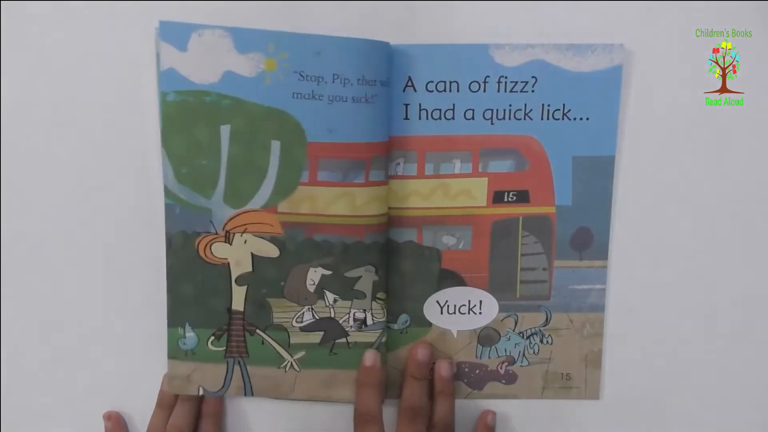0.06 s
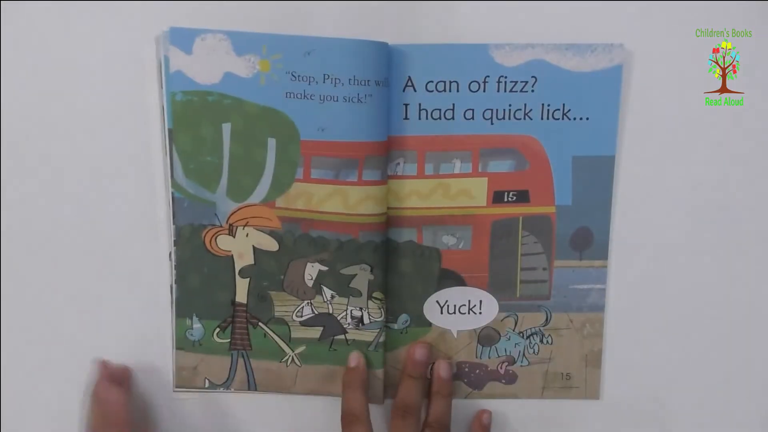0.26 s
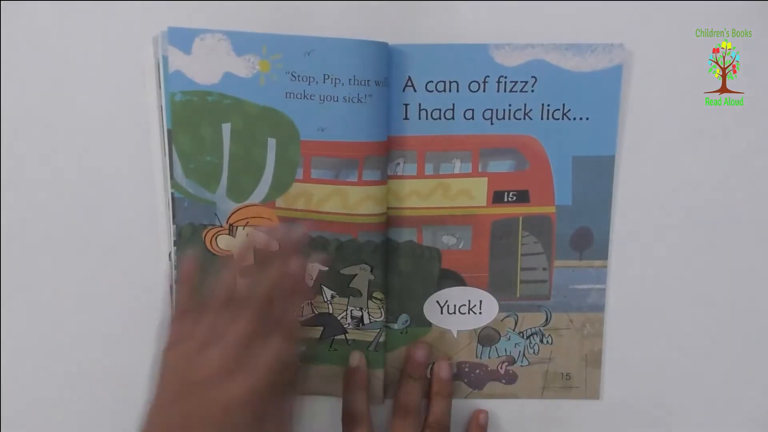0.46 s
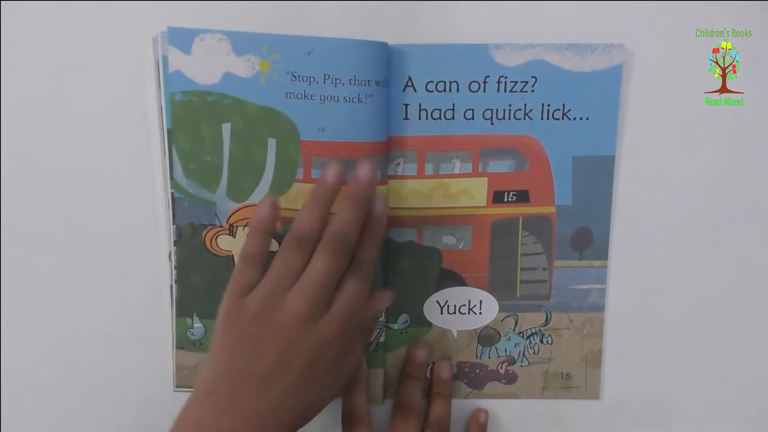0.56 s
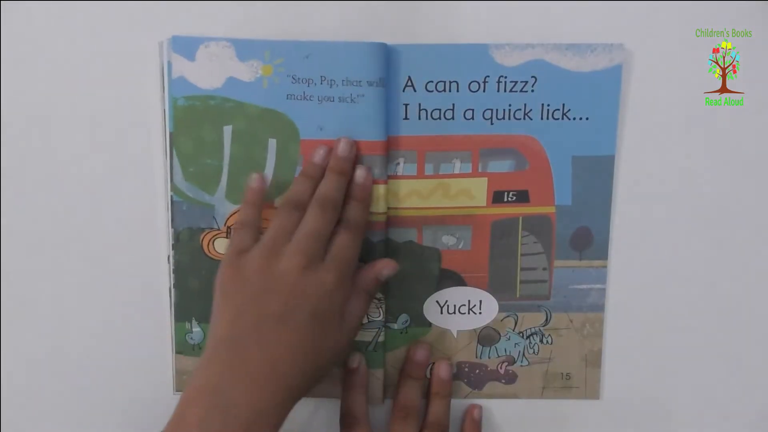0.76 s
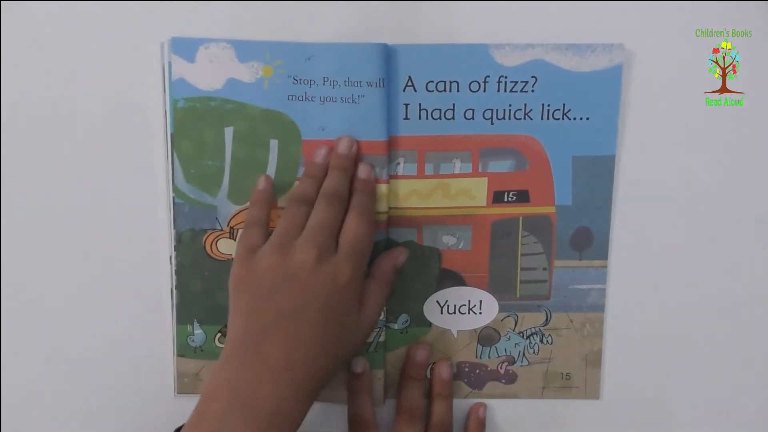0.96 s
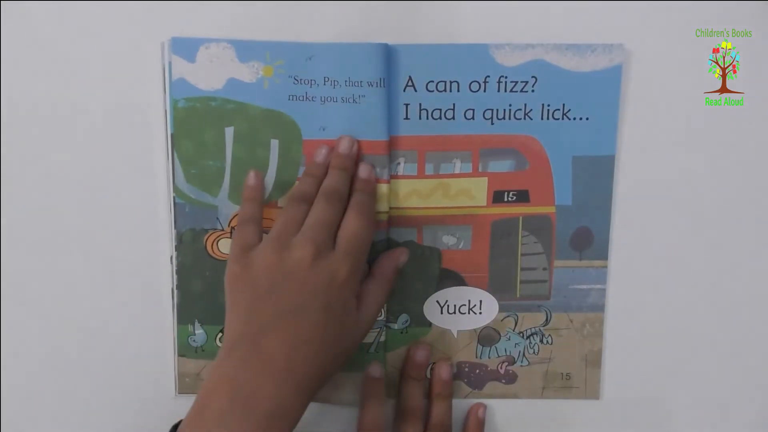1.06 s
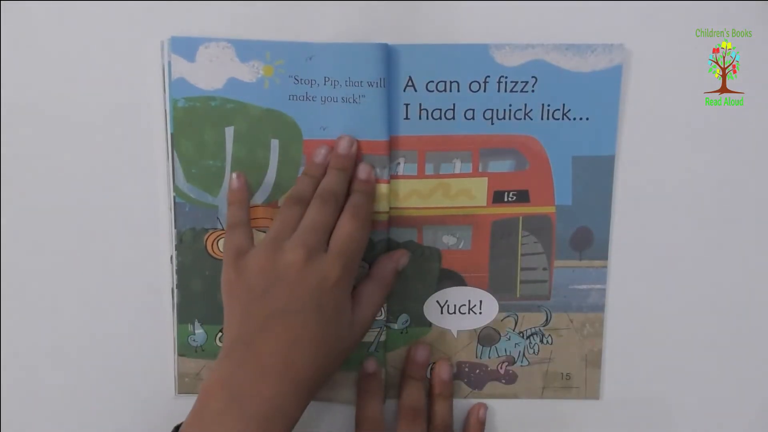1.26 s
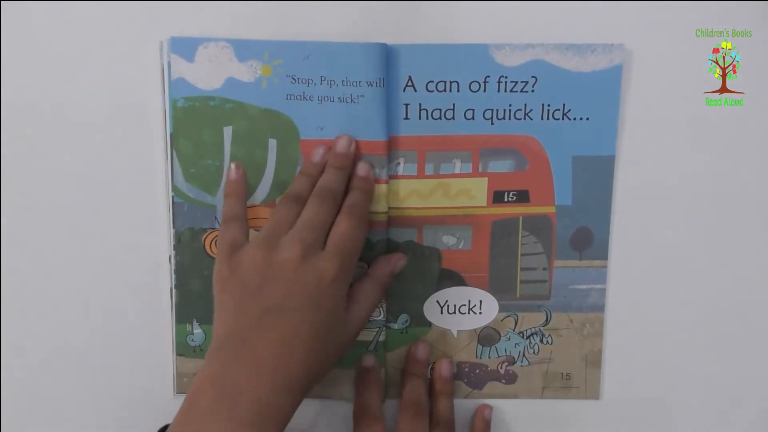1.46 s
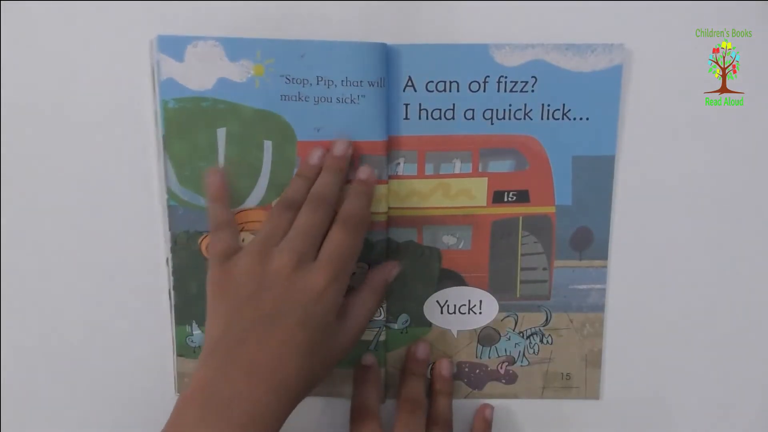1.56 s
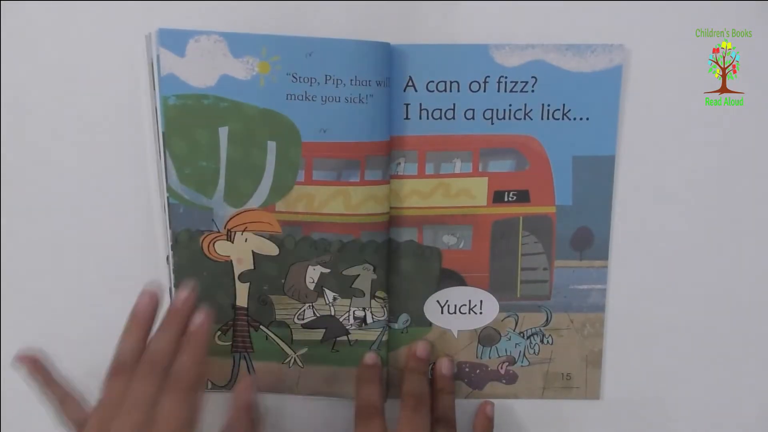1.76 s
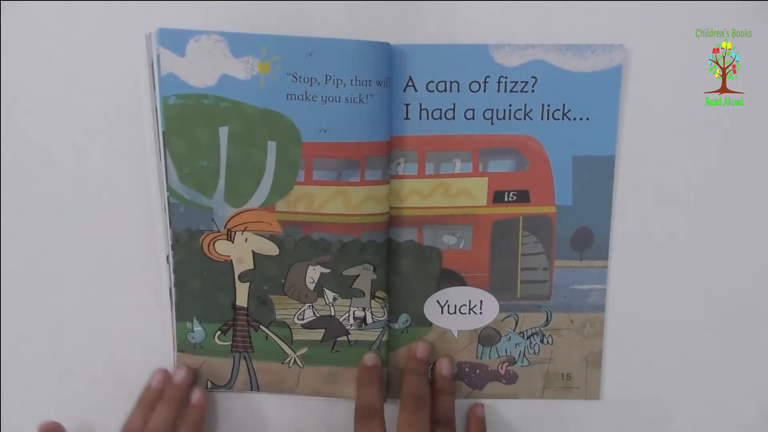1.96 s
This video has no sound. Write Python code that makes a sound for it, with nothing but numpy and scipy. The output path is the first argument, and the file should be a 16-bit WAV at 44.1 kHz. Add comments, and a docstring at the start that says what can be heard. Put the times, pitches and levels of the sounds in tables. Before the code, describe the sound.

A thin book's glossy page slides down with light ticks and growing rustle, then slaps flat with a sharp, loud snap at about 0.27 seconds, ending in a short hiss of air. Much quieter paper crackles come at 0.7 and 0.95, soft dull table thuds near 1.25-1.35, and a muted press-and-lift knock at 1.7. Close microphone, small quiet room, low hum, hiss, faint high whine and an intermittent thin buzz.

```python
"""Page slapping flat, close up

A small quiet room, the microphone close to a thin book: a hand lets a glossy page slide and slap flat, then
presses and lifts off it. Clicks ring the page as snaps, dense noise slips ring it as rustle, and a narrow hiss
follows the slide. Decaying sines thud in the table. Shaped noise gives room tone and microphone hiss, rung noise
a wavering hum, and sines a steady whine and a thin buzz that comes and goes."""
import sys
import numpy as np
from scipy import signal
from scipy.fft import rfft, irfft
from scipy.io import wavfile
from scipy.ndimage import uniform_filter1d

SR = 44100
rng = np.random.default_rng(int(sys.argv[2]) if len(sys.argv) > 2 else 0)


def inscribe(sig):
    """Save sig as 16-bit PCM at rate SR to the path in sys.argv[1].

    A 1-D sig is mono; a 2-D sig holds one channel per row.
    Samples are clipped to [-1, 1] before scaling.
    """
    pcm = np.round(np.clip(np.atleast_2d(sig).T, -1, 1) * 32767)
    wavfile.write(sys.argv[1], SR, pcm.astype(np.int16))


N = 88200
T = np.arange(N) / SR  # time [s]
PATCH_DB, PATCH_HZ = 2, 200.4  # spread and rate of the uneven patches in paper noise


def undb(db):
    """Turn a level in dB into a gain."""
    return 10 ** (np.asarray(db, float) / 20)


def unit(x):
    """Scale to rms 1."""
    return x / np.sqrt(np.mean(x ** 2))


def along(table, hz):
    """Read a table on a log-frequency axis."""
    table_hz, values = np.array(table).T
    return np.interp(np.log(hz + 1), np.log(table_hz), values)


def walk(rate_hz):
    """Random levels with linear slides between them, spread 1."""
    hold = int(SR / rate_hz)
    steps = np.repeat(rng.standard_normal(N // hold + 1), hold)
    return unit(uniform_filter1d(steps, hold)[:N])


def pan(x, db):
    """Spread to two channels, left louder than right by db."""
    return x * undb(np.array([[db], [-db]]) / 2)


def ring(x, hz, t60):
    """One resonance, dying by 60 dB in t60 seconds."""
    pole = np.exp(2j * np.pi * hz / SR - np.log(1000) / (t60 * SR))
    return signal.lfilter([1], [1, -pole], x).imag


# resonances of the page in three ranges, and of the table under it:
# (frequency [Hz], decay t60 [s], relative level [dB])
BODY_MODES = [(560, .008, -17), (760, .008, -16), (1000, .012, 0), (1750, .004, -18)]
MIDDLE_MODES = [(2440, 0.0039, -5), (3560, 0.0048, -9), (3830, 0.0037, 5.5), (4150, 0.0034, -7.5)]
TREBLE_MODES = [(7720, 0.0039, 3.5), (8510, 0.0019, 15.5), (10000, .004, -3.5), (12300, .003, -8.5)]
TABLE_MODES = [(55, .06, -11), (140, .04, -6), (290, .02, -4), (450, .02, -4), (600, .04, -1)]
# band kept around each part, in the order body, middle, treble, table: (low edge [Hz], high edge [Hz])
PART_EDGES = [(420, 2070), (1730, 4000), (5720, 13300), (25, 410)]


def rings(x, part, ratio=1):
    """The resonances of one part, shifted in pitch by ratio and damped outside its band."""
    modes = [BODY_MODES, MIDDLE_MODES, TREBLE_MODES, TABLE_MODES][part]
    edges = np.array(PART_EDGES[part]) * ratio
    band = signal.butter(2, edges, "bandpass", fs=SR, output="sos")
    ringing = sum(undb(db) * ring(x, hz * ratio, t60) for hz, t60, db in modes)
    return signal.sosfilt(band, ringing)


# paper snaps: (time [s], body pitch [ratio], middle and treble pitch [ratio],
# body peak [dB], middle peak [dB], treble peak [dB]), levels before panning and room
SNAPS = [(0.1067, 0.68, 0.86, -48.5, -42.5, -50.5), (.180, 1.5, 1.03, -45, -32.5, -42),
         (0.2326, 1, 1.005, -41, -37, -26.5), (0.249, 1.7, 1.1, -55, -41, -36),
         (0.2726, 1.02, 1.11, -14, -28, -29), (0.6888, 0.93, 0.96, -40.5, -39, -44.5),
         (.701, 0.84, 0.73, -43, -47, -53), (.7375, 0.97, .96, -39.5, -44.5, -41),
         (0.9354, 1.17, 0.83, -51, -64, -74), (0.947, 1.02, .92, -42.5, -58, -59),
         (.955, 1.03, 0.82, -46, -58, -67), (0.9675, 1.01, 0.83, -32.5, -55, -54),
         (0.977, 0.74, 1.2, -58, -84, -59), (1.248, 1.07, 0.98, -49, -48.5, -49.5),
         (1.355, 1.1, 0.86, -62, -61.5, -76), (1.534, 1.07, 0.97, -57, -59.5, -84.5),
         (1.589, 0.96, 1.04, -46.5, -61, -50.5), (1.628, 0.99, 1.02, -43, -60, -50),
         (1.6475, 1.16, 0.95, -56, -63, -43.5), (1.696, 0.94, 0.85, -30, -62, -51),
         (1.699, 1.037, 0.73, -27, -48, -64), (1.718, 0.46, 0.8, -56, -59.5, -50.5),
         (1.917, 1.4, 1.25, -80, -88, -53.5), (1.926, 0.82, 0.95, -81, -80, -56),
         (1.933, 1.6, .9, -86, -83, -55), (1.96, 0.98, 1, -81, -67.5, -58.5)]
# strength of the crumbling against the first click, for body, middle, treble [ratio]
CRUMBLE = [.03, .3, .4]
CRUMBLE_S = 0.0013  # time constant of the crumbling


def snaps(part):
    """A sharp click with a crumbling after-burst rings one part of the page."""
    k = np.arange(1600)  # samples in one snap
    out = np.zeros(N + len(k))
    crumbs = rng.standard_normal((len(SNAPS), len(k)))
    for (start, body_ratio, upper_ratio, *db), crumb in zip(SNAPS, crumbs):
        push = CRUMBLE[part] * crumb * np.exp(-k / (CRUMBLE_S * SR))
        push[0] = 1
        snap = rings(push, part, upper_ratio if part else body_ratio)
        out[int(start * SR) + k] += snap / np.abs(snap).max() * undb(db[part])
    return out[:N]


# page sliding down flat: (time [s], body level [dB], middle level [dB], treble level [dB], table level [dB])
SLIDE = [(0., -88.5, -107, -86, -65), (.014, -54.5, -62, -70, -61.5), (.05, -56.5, -63, -73.5, -84),
         (.10, -68.5, -71.5, -74, -78), (.115, -58, -68, -67.5, -63), (.15, -70, -66.5, -70.5, -71),
         (.16, -67, -65.5, -58, -69.5), (.2, -61.5, -59, -47.5, -59), (.22, -65, -62.5, -51.5, -72),
         (.232, -51, -51.5, -46, -74.5), (.255, -72, -54.5, -43.5, -70.5), (.275, -37.5, -51, -38, -47.5),
         (.292, -43.5, -41.5, -30.5, -49.5), (.299, -60, -55, -65, -52), (0.309, -59.5, -70, -62.5, -63),
         (.33, -69, -82, -79.5, -60)]
# short rubs of skin on paper: (time [s], length [s],
# body level [dB], middle level [dB], treble level [dB], table level [dB])
RUBS = [(0.696, 0.027, -56.5, -67.5, -60.5, -68), (0.839, 0.015, -58, -61.5, -54, -81),
        (0.883, 0.1, -75, -87, -76.5, -80), (1.244, 0.022, -64.5, -73, -91, -66),
        (1.347, 0.06, -77, -92, -81, -60.5), (1.445, 0.099, -79, -90.5, -81, -72),
        (1.614, 0.03, -65.5, -75, -65.5, -71), (1.689, 0.026, -56.5, -67.5, -58.5, -64.5),
        (1.716, 0.051, -74, -84, -74, -64)]
RUB_ATTACK_S, RUB_RELEASE_S = .004, .003  # linear rise; time constant of the fall
GRAIN_SPREAD_DB = 2.0  # mean boost of a slip, exponentially distributed


def rustle(part):
    """Dense tiny slips of uneven size, in patches, while paper slides or skin rubs."""
    slide = np.array(SLIDE)
    gain = undb(np.interp(T, slide[:, 0], slide[:, 1 + part], right=-140))
    for start, length, *db in RUBS:
        rise = np.clip((T - start) / RUB_ATTACK_S, 0, 1)
        fall = np.exp(-np.maximum(T - start - length, 0) / RUB_RELEASE_S)
        gain = gain + undb(db[part]) * rise * fall
    slip_db = GRAIN_SPREAD_DB * rng.exponential(size=N) + PATCH_DB * walk(PATCH_HZ)
    slips = unit(rng.standard_normal(N) * undb(slip_db))
    # dividing by the steady ringing makes the table levels rms levels
    return rings(slips * gain, part) / rings(slips, part).std()


GAP_HZ, GAP_T60_S = 5546, 0.0074
GAP_DB = -12  # below the treble of the slide


def gap():
    """Air rushing out of the gap under the sliding page: a narrow hiss that follows the slide's treble."""
    slide = np.array(SLIDE)
    treble_db = np.interp(T, slide[:, 0], slide[:, 3], right=-140)
    gain = undb(treble_db + GAP_DB + PATCH_DB * walk(PATCH_HZ))
    hiss = ring(rng.standard_normal(N), GAP_HZ, GAP_T60_S)
    return gain * unit(ring(hiss, GAP_HZ, GAP_T60_S))


# dull table thuds: (time [s], level before onset and decay [dB], pitch [Hz])
THUDS = [(0.277, -47.5, 330), (.305, -70, 110), (.737, -51, 505), (1.256, -41.5, 162), (1.281, -39, 182),
         (1.297, -43.5, 172), (1.352, -51, 296), (1.696, -35.5, 510), (1.724, -43.5, 550),
         (1.718, -39.5, 174)]
THUD_T60_S = .02


def thuds():
    """Soft pushes of the hand on the table: sines with a rounded onset, quickly damped."""
    out = np.zeros(N)
    for start, db, hz in THUDS:
        t = np.maximum(T - start, 0)
        onset = 1 - np.exp(-4 * hz * t)
        decay = 1000. ** (-t / THUD_T60_S)
        out += undb(db) * np.sin(2 * np.pi * hz * t) * onset * decay
    return out


# the small room as body, middle, treble and table excite it: decay t60 [s],
# side against mid [ratio], tail level [dB], lowpass corner [Hz]
ROOM_T60_S = [0.37, 0.48, 0.56, 0.36]
ROOM_WIDTH = [0.29, .05, 0.087, 0.44]
ROOM_DB = [-11, -18, -26, -9]
ROOM_TOP_HZ = [1250, 6000, 10400, 900]
ROOM_GAP_S = .007  # silence before the reflections


def room(x, part):
    """Diffuse decaying reflections, duller than the direct sound, partly different left and right."""
    t = T[:SR // 2]
    decay = 1000. ** (-t / ROOM_T60_S[part]) * (t > ROOM_GAP_S)
    mid, side = rng.standard_normal((2, len(t))) * decay
    tail = mid + ROOM_WIDTH[part] * side * np.array([[1], [-1]])
    tail = tail / np.sqrt(np.sum(mid ** 2))
    lowpass = signal.butter(2, ROOM_TOP_HZ[part], fs=SR, output="sos")
    dull = signal.sosfilt(lowpass, x.mean(axis=0))
    return x + undb(ROOM_DB[part]) * signal.fftconvolve(dull[None], tail, axes=1)[:, :N]


# phase between the two microphone ports: (frequency [Hz], left lead [rad])
PORT_PHASE = [(100, -1.3), (340, -1.4), (1000, -0.27), (2200, -0.6), (3400, 1), (12000, -0.58)]


def ports(x):
    """The two microphone ports hear near sound with a phase lag that depends on pitch."""
    turn = along(PORT_PHASE, np.fft.rfftfreq(N, 1 / SR)) / 2
    return irfft(rfft(x) * np.exp(1j * np.array([turn, -turn])), N)


# room tone and hiss, spectrum of the mid: (frequency [Hz], relative level per Hz [dB])
AIR = [(20, -19), (40, -13), (81, -14.5), (149, -7), (300, -9.5), (461, -18), (600, -17), (889, -19),
       (1280, -24.5), (1720, -24.5), (2600, -31.5), (3770, -27), (5000, -38.5), (6900, -26), (9000, -24.5),
       (13000, -28), (16000, -27.5)]
# its stereo spread: (frequency [Hz], side minus mid [dB])
AIR_SIDE = [(60, 1.5), (110, 0), (200, -3), (380, 7), (700, 4.5), (1290, -5), (2380, -13), (4400, -37.5),
            (8120, -7.5), (15000, -1)]
# its tilt to one side: (frequency [Hz], left gain minus right gain [dB])
AIR_BALANCE = [(60, -9.5), (110, 22), (200, 0), (380, 3.5), (700, -3), (1290, 2.5), (2380, 0.5),
               (4400, 0.0), (8120, -1), (15000, 1)]
AIR_DB, AIR_SWAY_DB = -69.5, .6  # rms of the mid; spread of its slow sway
HUM_HZ, HUM_T60_S, HUM_DB = 138, .2, -72.5  # rms level
WHINE_HZ, WHINE_DB = 15231, -78.5  # rms level
BUZZ_HZ = 1432  # base of the buzz, itself not sounded
# buzz tones: (multiple of the base, rms level [dB])
BUZZ = [(5, -78), (6, -82), (7, -89)]
# when the buzz is on: (start time [s], end time [s], level change [dB])
BUZZ_ON = [(0., .13, -4), (1.447, 1.625, 0)]


def air():
    """Room tone and microphone hiss, a wavering hum, a steady whine and a thin buzz that comes and goes."""
    hz = np.fft.rfftfreq(N, 1 / SR)
    mid, side = rfft(rng.standard_normal((2, N))) * undb(along(AIR, hz))
    side = side * undb(along(AIR_SIDE, hz))
    lean = undb(along(AIR_BALANCE, hz) / 2)
    tone = irfft(np.array([(mid + side) * lean, (mid - side) / lean]), N)
    tone = tone * undb(AIR_DB + AIR_SWAY_DB * walk(1.7)) / irfft(mid, N).std()
    # separate noise left and right makes the hum waver independently
    hum = np.array([unit(ring(rng.standard_normal(N), HUM_HZ, HUM_T60_S)) for _ in range(2)])
    on = sum(undb(db) * ((T >= start) & (T < end)) for start, end, db in BUZZ_ON)
    on = uniform_filter1d(on, size=200)  # soft edges
    buzz = on * sum(undb(db) * np.sin(2 * np.pi * k * BUZZ_HZ * T) for k, db in BUZZ)
    whine = undb(WHINE_DB) * np.sin(2 * np.pi * WHINE_HZ * T)
    return tone + undb(HUM_DB) * hum + np.sqrt(2) * (buzz + whine)  # sqrt(2): sine rms to peak


# left minus right level of body, middle, treble, table [dB]
PART_PAN_DB = [2, -1.1, -1, 4.0]


def scene():
    """Page and table in the room, through the ports, over the room tone."""
    page = [room(pan(snaps(part) + rustle(part), PART_PAN_DB[part]), part) for part in range(3)]
    table = room(pan(thuds() + rustle(part=3), PART_PAN_DB[3]), part=3)
    return air() + ports(sum(page) + table + gap())


TOP_HZ = 15850


def record(dry):
    """The recorder cuts the top steeply."""
    lowpass = signal.ellip(10, .2, 70, TOP_HZ, fs=SR, output="sos")
    return signal.sosfilt(lowpass, dry)


dry = scene()
out = record(dry)
inscribe(out)
```